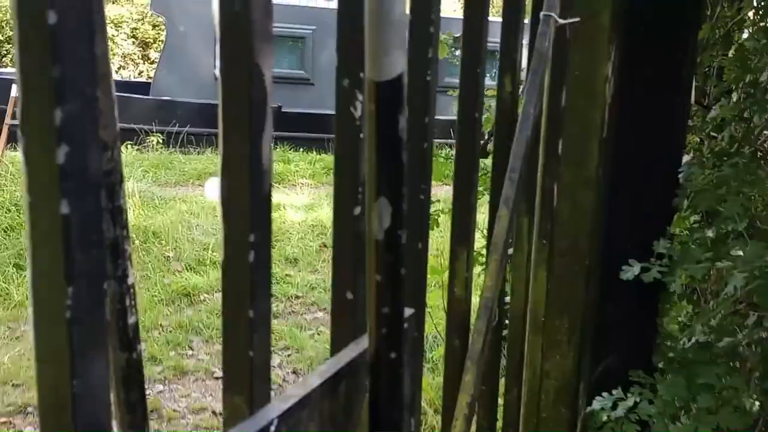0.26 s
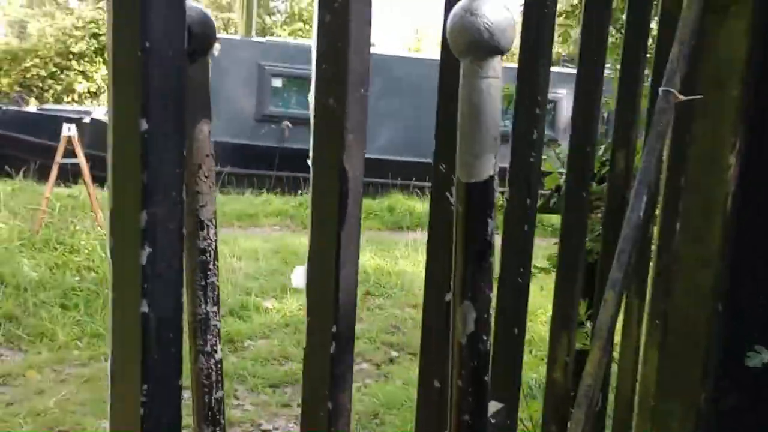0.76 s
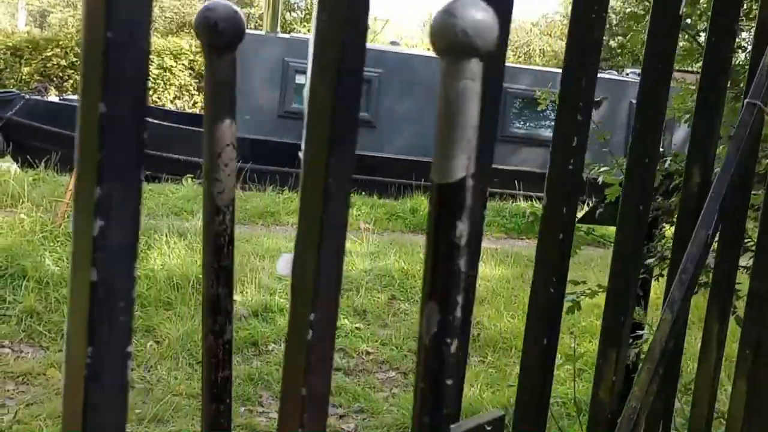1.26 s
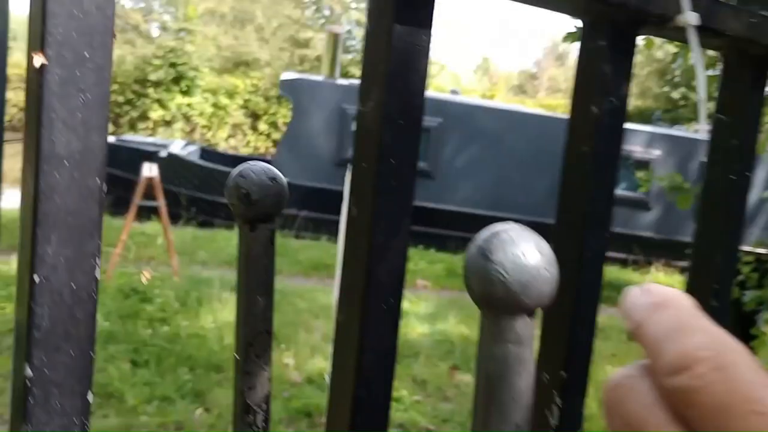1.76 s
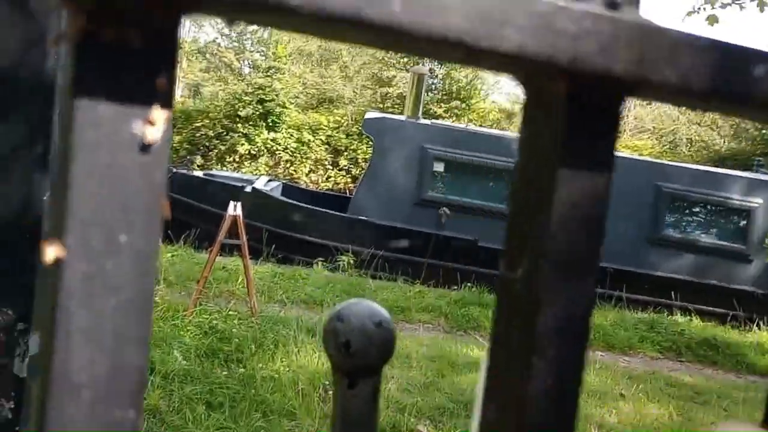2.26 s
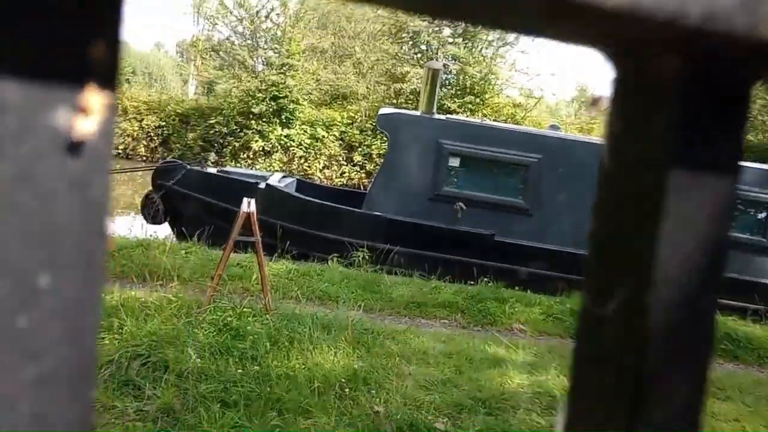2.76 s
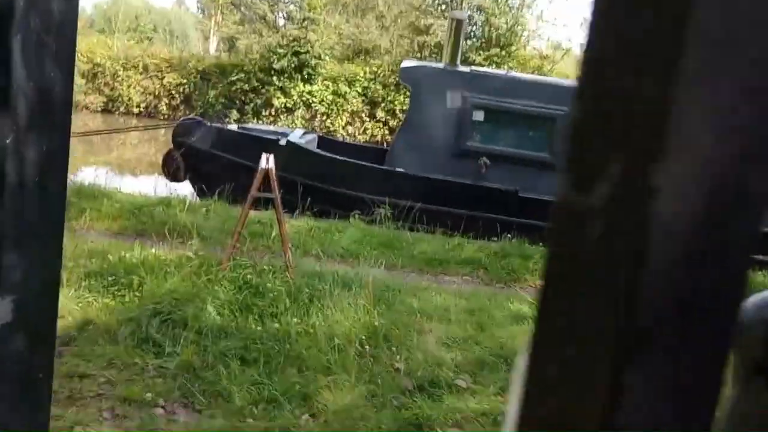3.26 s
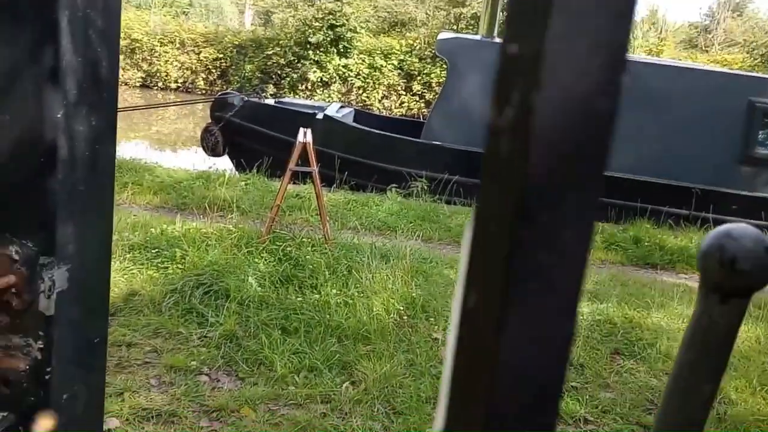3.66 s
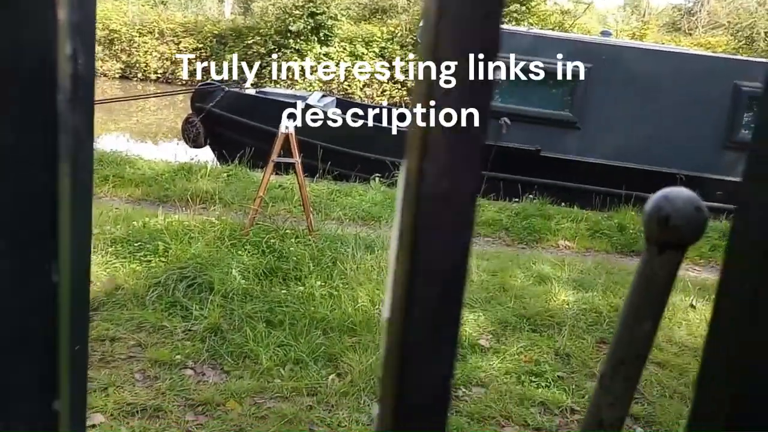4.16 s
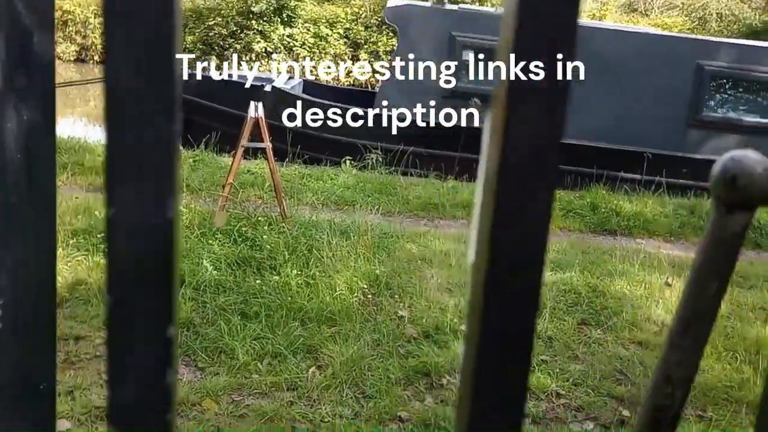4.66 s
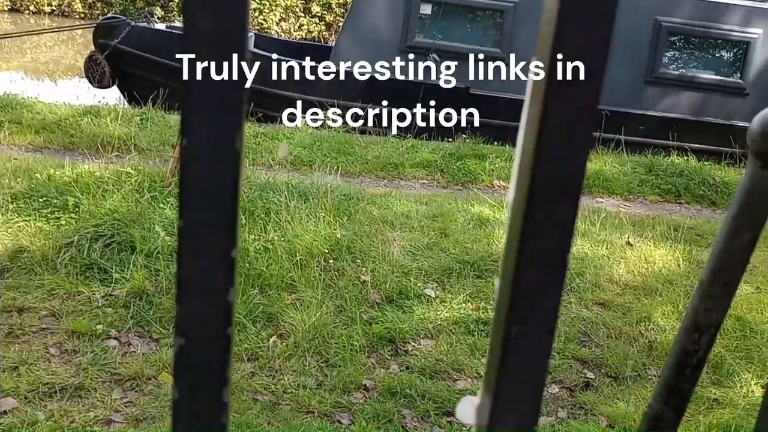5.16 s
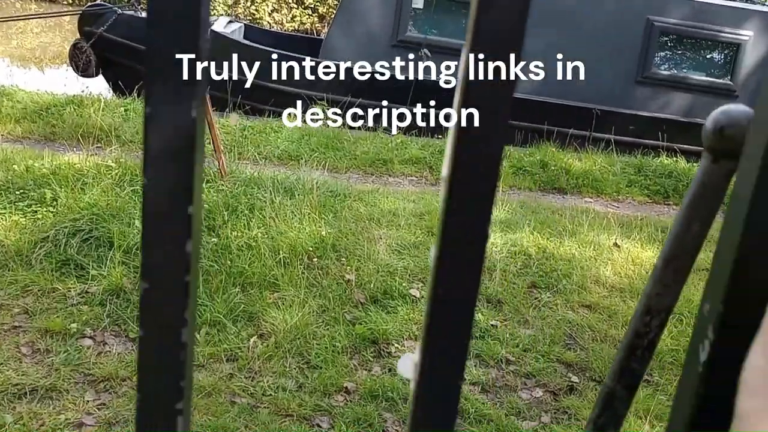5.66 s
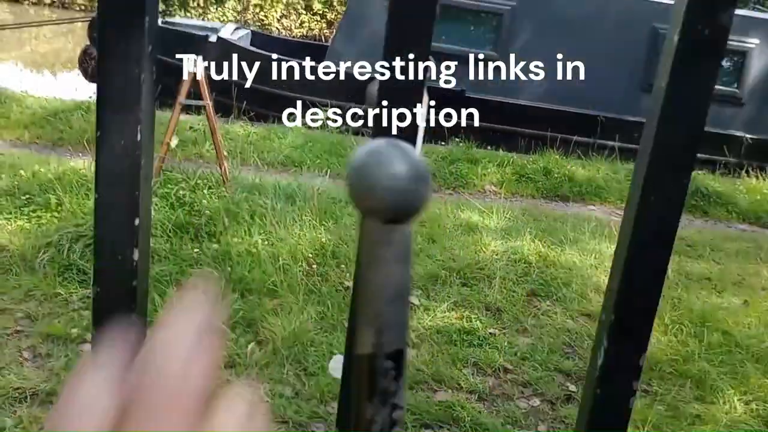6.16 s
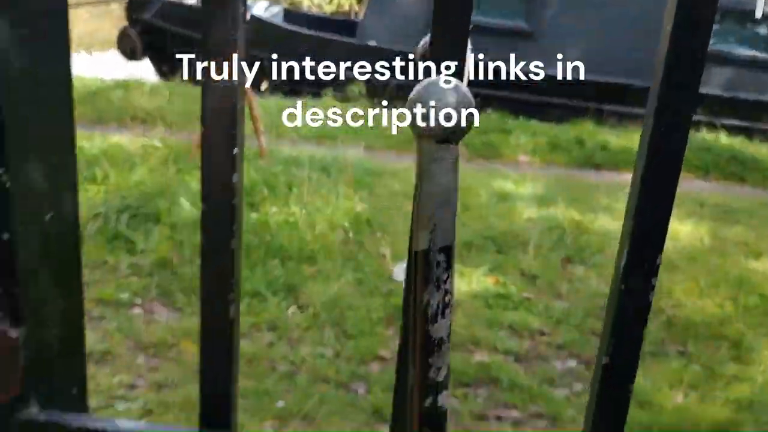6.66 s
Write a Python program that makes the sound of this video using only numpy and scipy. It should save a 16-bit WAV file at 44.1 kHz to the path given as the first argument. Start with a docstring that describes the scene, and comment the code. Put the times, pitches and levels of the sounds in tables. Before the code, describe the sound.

An iron gate is worked outdoors: knocks, three bright metallic clanks, a scrape, a brief hinge squeak, then a heavy clanging slam and dying rattle.

```python
"""Iron gate worked by hand, outdoors, close up

A brief rush of air ends abruptly, then quiet air fades in under small ticks of handling.
The drop rod knocks, the frame clanks three times, iron slides, a hinge squeaks, then the leaf thuds home
against its stop and rattles. Each blow sums a chattering crack and clang of crowded fence modes, a longer
after-ring and the struck bar's own partials; the rest is shaped noise, and a swept tone for the hinge."""
import sys
import numpy as np
from scipy import signal
from scipy.fft import rfft, irfft
from scipy.io import wavfile

SR = 44100
rng = np.random.default_rng(int(sys.argv[2]) if len(sys.argv) > 2 else 0)


def store_wav(level_fs):
    """Save 16-bit WAV to argv[1]."""
    pcm = np.round(np.clip(np.atleast_2d(level_fs), -1, 1) * 32767)
    wavfile.write(sys.argv[1], SR, pcm.T.astype(np.int16))


N = 305304

# crowded modes of the whole fence; both levels are relative, clang times are for a length factor of 1:
# (pitch_hz, clang_db_per_hz, clang_t60_s, after_ring_db_per_hz, after_ring_t60_s,
#  left_right_correlation, left_minus_right_db)
FENCE_SPECTRUM = [(53.4, -39, 1, -26, 1.2, 1, -2), (147, -18, 0.68, -24, 2.63, 0.96, 3),
                  (296, -15.5, 1, -8, 3.2, 0.82, 0.5), (480, -15, 0.6, -8, 4, 0.36, 3),
                  (790, -6.5, 0.41, 4, 1.8, 0.044, -1), (1254, -6.5, 0.54, 0, 1.78, -0.47, 1),
                  (2060, 4, 0.17, 6.5, 1.49, -0.058, -12), (2855, -0.5, 0.39, -5, 0.56, 0.18, 9),
                  (3746, -12.5, 0.23, -2.5, 1.33, -0.046, 2), (6090, -17, 0.14, -24.5, 0.54, -0.081, -4.5),
                  (9150, -33, 0.27, -44, .5, 0.33, 1), (15600, -37.5, 0.19, -44.5, .4, -0.61, -2)]

CUTOFF_HZ = 16000
EDGES_HZ = 31.25 * 2 ** np.arange(0, 9.1, .5)   # half-octave bands
CENTRES_HZ = np.sqrt(EDGES_HZ[1:] * EDGES_HZ[:-1])
RING_SAMPLES = 2 * SR
AGE = np.arange(RING_SAMPLES) / SR   # seconds since one sound began
TIME = np.arange(N) / SR
LEFT_RIGHT_SIGN = np.array([[1], [-1]])


def from_db(db):
    """Decibels to gain."""
    return 10 ** (np.asarray(db) / 20)


def rms_one(x):
    """Scale to an rms of 1."""
    return x / np.sqrt(np.mean(x ** 2) + 1e-20)


def at_hz(rows, hz):
    """Every column of a spectrum table, read on a log-frequency axis."""
    known_hz, *columns = np.transpose(rows)
    return [np.interp(np.log(hz), np.log(known_hz), column) for column in columns]


def fade(t60):
    """Free decay by 60 dB in t60 seconds."""
    return np.exp(-np.log(1000) * AGE / max(t60, 1e-3))


def pan(db):
    """Left and right gains of equal total power, db apart."""
    return rms_one(from_db([[db / 2], [-db / 2]]))


def stereo(mid, side, likeness):
    """Two unrelated signals mixed into a pair with the given correlation."""
    c = np.clip(likeness, -1, 1)
    return np.sqrt((1 + c) / 2) * mid + np.sqrt((1 - c) / 2) * side * LEFT_RIGHT_SIGN


def add(out, s, sound):
    """Mix a sound in at time s."""
    start = round(s * SR)
    out[:, start:start + sound.shape[1]] += sound[:, :N - start]


def open_air(spectrum):
    """Smooth distant noise, the two sides most alike in the bass."""
    # (pitch_hz, left_right_correlation)
    air_likeness = [(50, 0.92), (150, 0.92), (400, 0.66), (1000, 0.033), (4000, 0.01)]
    hz = np.maximum(np.fft.rfftfreq(N, 1 / SR), 1)
    mid, side = rfft(rng.normal(size=(2, N))) * from_db(at_hz(spectrum, hz)[0])
    likeness = at_hz(air_likeness, hz)[0]
    return rms_one(irfft(stereo(mid, side, likeness), N))


def opening_rush(level_db=-39.5, end_s=0.1564, closing_s=0.0065):
    """Broad noise, strongest in the bass, that ends within a few milliseconds."""
    # outdoor rush: (pitch_hz, relative_level_db_per_hz)
    rush_spectrum = [(18, -48.5), (30, -31), (56, -9), (81, -0.5), (281, -9.5), (346, -15.5), (905, -16.5),
                     (1300, -21), (1870, -16.5), (3980, -43.5), (15000, -69)]
    closing = np.clip((end_s - TIME) / closing_s, 0, 1)
    return from_db(level_db) * open_air(rush_spectrum) * closing


def quiet_air(level_db=-60, start_s=.21, fade_in_s=0.17):
    """Steady, bass-heavy outdoor noise that fades in and stays."""
    # quiet open air: (pitch_hz, relative_level_db_per_hz)
    air_spectrum = [(18, -60), (30, -21.5), (124, -3.5), (319, -14), (355, -17), (780, -15.5), (962, -21),
                    (1760, -24.5), (2060, -22.5), (16000, -50.5)]
    fade_in = np.clip((TIME - start_s) / fade_in_s, 0, 1)
    return from_db(level_db) * fade_in * open_air(air_spectrum) * pan(-0.82)


def ticks(low_hz=620):
    """Light touches: band-limited noise puffs that die at once and leave the iron silent."""
    # dry ticks and scuffs of handling, levels before the make-up for band-limiting:
    # (start_s, level_db, decay_to_1/e_s)
    touches = [(0.392, -43, 0.00058), (0.551, -44, 0.0022), (2.147, -47, 0.0012), (2.231, -41, .011),
               (4.734, -33, .0007), (5.293, -51, .015), (5.324, -44, 0.013), (5.339, -41, 0.0091)]
    top_1ms_hz, dulling = 3030, 0.26   # top of a 1 ms tick; longer touches are duller, by this power
    out = np.zeros((2, N))
    for s, db, decay_s in touches:
        decay_s = max(decay_s, 1e-4)
        top_hz = np.clip(top_1ms_hz * (decay_s / .001) ** -dulling, 1.5 * low_hz, CUTOFF_HZ)
        noise = stereo(*rng.normal(size=(2, RING_SAMPLES)), 0.13)
        puff = noise * np.exp(-AGE / decay_s) + 1e-18
        band = signal.butter(2, [low_hz, top_hz], "band", fs=SR, output="sos")
        # make up the power lost to the narrower band
        add(out, s, from_db(db) * np.sqrt(SR / 2 / top_hz) * signal.sosfilt(band, puff))
    return out


def band_gains(db_per_hz):
    """Band amplitudes with total power 1."""
    gains = from_db(db_per_hz) * np.sqrt(np.diff(EDGES_HZ))
    return gains / np.linalg.norm(gains)


def fence_modes(db_per_hz, uneven_db, count):
    """Undamped modes of very unequal strength, gathered in stereo half-octave bands."""
    # the power packs the modes closest in the bass
    mode_hz = EDGES_HZ[0] + CUTOFF_HZ * ((np.arange(count) + rng.random(count)) / count) ** 1.6
    size = from_db(np.interp(mode_hz, CENTRES_HZ, db_per_hz) + uneven_db * rng.normal(size=count))
    strength = size * (rng.normal(size=(2, count)) + 1j * rng.normal(size=(2, count)))
    *_, likeness, pan_db = at_hz(FENCE_SPECTRUM, CENTRES_HZ)
    bands = []
    for k, (low, high) in enumerate(zip(EDGES_HZ, EDGES_HZ[1:])):
        inside = (mode_hz >= low) & (mode_hz < high)
        lines = np.zeros((2, RING_SAMPLES // 2 + 1), complex)
        lines[:, (mode_hz[inside] * RING_SAMPLES / SR).astype(int)] = strength[:, inside]
        mid, side = irfft(lines)
        bands.append(stereo(rms_one(mid), rms_one(side), likeness[k]) * pan(pan_db[k]))
    return np.array(bands, np.float32)


def bar_tone(modes, pan_db, twin=0.5, split=0.00406):
    """The clear partials of one bar; each beats with a twin bending the other way."""
    out = np.zeros((2, RING_SAMPLES))
    for hz, db, t60 in modes:
        # higher partials reach the two sides further out of step and more unequal
        skew = rng.choice([-1, 1]) * min(hz / 1100, .85) * LEFT_RIGHT_SIGN
        sides = pan(pan_db * np.sqrt(hz / 2000))
        turn = 2 * np.pi * hz * AGE
        twin_turn = turn * (1 + split * rng.choice([-1, 1]) * rng.uniform(0.432, 2.507))
        pair = np.sin(np.float32(turn + skew)) + twin * np.sin(np.float32(twin_turn - skew))
        out += from_db(db) * fade(t60) * sides * pair
    return out


def contact(chatter_db, chatter_s, taps_per_s=180):
    """One impact, then loose iron bouncing in uneven, dying taps; total energy 1."""
    struck = rng.random(RING_SAMPLES) < taps_per_s / SR
    taps = struck * rng.normal(size=RING_SAMPLES) * np.exp(-AGE / max(chatter_s, 1e-3))
    force = from_db(chatter_db) * taps / (np.linalg.norm(taps) + 1e-12)
    force[0] = 1
    return force[None, :SR // 2] / np.linalg.norm(force)


def rebounds(count):
    """The slammed leaf rebounds at an even pace, weaker and duller each time."""
    start_s, gap_s, chatter_s = 6.158, .082, 0.084
    first_db, loss_db = -9.5, 2.5
    first_treble_db, dulling_db = 5.5, 3
    return [(start_s + k * gap_s, "leaf", first_db - k * loss_db,
             first_treble_db - k * dulling_db, chatter_s) for k in range(count)]


def clanks(clean_crack=1.1, ring_follow=0.45):
    """Each blow: a crack, a quickly damped clang, the fence's after-ring and the struck bar's own tone."""
    # blows on the gate: (start_s, part_struck, strength_db, treble_db, chatter_decay_to_1/e_s)
    blows = [(0.893, "post", -33.5, -30, 0.028), (0.934, "rod", -32, 4.5, .11),
             (0.950, "rod", -29.5, 4.5, 0.075), (1.085, "rod", -35, -1, 0.024),
             (2.443, "frame", -38, -8, 0.015), (2.461, "frame", -24.5, 3.5, 0.0045),
             (2.585, "frame", -21.5, 2.5, 0.017), (2.840, "frame", -20, 4.5, .032),
             (2.856, "frame", -26.5, 11, .02), (2.905, "frame", -25.5, 3.5, 0.027),
             (4.298, "post", -59.5, -8, 0.067), (4.364, "rod", -37, -10, 0.013),
             (4.548, "post", -56.5, -15, 0.15), (5.617, "keeper", -23, -1.5, 0.0086),
             (5.773, "keeper", -42, 4, 0.0034), (5.844, "latch", -14.5, .5, 0.0059),
             (5.932, "leaf", -14, 3.5, 0.065), (5.941, "stop", -35, -10, 0.092),
             (5.982, "leaf", -9, -1.5, 0.11), (6.122, "leaf", -10.5, -1, 0.014),
             (6.632, "leaf", -22, 1, .014), (6.695, "leaf", -24, -0.5, 0.064)]
    # partials of each iron part, levels relative to its tone: part: (pitch_hz, level_db, t60_s)
    part_modes = {"stop": [(76, -16, 0.41), (112, -11, 0.32), (143.6, 0, 0.53), (176, -7, 0.67),
                  (211, -2, 0.97), (244, -9.5, 0.83)], "post": [(243, -14, 0.37), (349, 1, 1.86),
                  (412, -4, 0.11), (576, -7, 0.24), (672, -4, 0.78), (870, -18, 1.6)],
                  "rod": [(650, -9, 1.2), (899, -11, 2.56), (960, -22, 0.76), (1580, -10, 0.56),
                  (1930, -14, 1.3), (2250, -8, .4), (2430, -7, 0.73), (2950, -22, 0.4), (3700, -24, .6),
                  (3760, -28, 1.4), (5690, -10.5, 0.41)], "frame": [(275, -20, 6.2), (386.6, -21, 3.9),
                  (484, -30, 0.77), (580, -15, 4.7), (671, -6, 1.96), (896, -2.5, 2.7), (1029, -8, 2.9),
                  (1311.5, -25, 1.6), (1347, -2.5, 0.71), (1612, -5.5, 1.54), (1783, -17, 1.1),
                  (1853, -11, 1.6), (1910, -1.5, 2.15), (1904, -6, 1.85), (2030, -7, 0.94),
                  (2023, 12, 0.35), (2206, 15, 0.21), (2418, 2.5, 0.93), (2630, 2, 0.29), (3020, 1.5, 0.98),
                  (3185, 9.5, 0.29), (3725, -3, 0.8), (4470, -19, 0.63), (6090, -19, 1.36)],
                  "leaf": [(282, -13, 3.1), (352, -18.5, 2.4), (600, -27, 3.3), (808, -1.5, 0.34),
                  (888, -5, 1.9), (1026, -9, 3), (1375, 1.5, 1.1), (1590, -5.5, 2.6), (1614, 7, 0.66),
                  (1775, 5, 0.63), (1866, 10, 0.44), (1976, 0.5, 1.2), (2080, 4, 0.64), (2220, -3, 0.63),
                  (2680, -17, 1.1), (2420, -21, 0.5), (2610, -6, 1), (2720, 1, 0.74), (3100, -8, 1.4),
                  (3610, -11, 1), (3830, -7.5, 0.97)], "keeper": [(800, -8.5, 0.45), (1105, -10, 0.23),
                  (1420, -3, 0.57), (1900, -12, 0.39), (1946, -26, 0.4), (2470, 3.5, 0.58), (2820, -14, 1),
                  (3380, -7, 0.28), (4300, -11, .3), (5970, -24.5, 0.77)], "latch": [(925, 0, 0.15),
                  (1156, 2.5, 0.13), (3200, -2, 0.15), (4650, -18.5, 0.56), (6120, -11.5, 0.19),
                  (8120, -16.5, 0.32), (12830, -4, 0.29), (14340, -9, 0.21)]}
    # side each part leans to: part: left_minus_right_db at 2 kHz
    part_pan_db = {"stop": 4, "post": 1.5, "rod": -1, "frame": -7, "keeper": 0, "leaf": -7, "latch": 7}
    # softer contacts excite less treble: part: top_hz
    part_top_hz = {"stop": 900, "post": 4000, "rod": 7100, "frame": 10400, "keeper": 12300, "leaf": 13900,
                   "latch": 18000}
    # how each part takes a blow; the last two are relative to the blow:
    # part: (thump_db of a full-scale blow, clang_length_factor, after_ring_db, bar_tone_db)
    part_response = {"stop": (6, 1, -13, -0.5), "post": (2.5, 0.9, -5, -1.5),
                     "rod": (-10, 0.94, -11.5, -10.5), "frame": (-19, 1.4448, -15.5, -20),
                     "keeper": (-23, 1.63, -9.5, -4.5), "leaf": (-15, 0.81, -15, -20.5),
                     "latch": (-23.5, 0.98, -18, -7)}
    thump_hz, treble_hz, bass_edge_hz = 505, 3530, 60
    thump_follows = 0.31   # dB of thump per dB of strength: harder blows mostly add clang
    even_chatter_s = 0.027   # chatter of this length carries as much energy as its first impact
    grit_db = -16   # even a soft contact lets this much of the top treble through
    contact_s, crack_db, crack_s = 0.00053, -8, 0.0017

    out = np.zeros((2, N))
    clang_db, clang_t60, after_db, after_t60, _, _ = at_hz(FENCE_SPECTRUM, CENTRES_HZ)
    crowded = fence_modes(clang_db, uneven_db=3.5, count=640)
    lasting = fence_modes(after_db, uneven_db=2.5, count=400)
    lows = 1 / (1 + (CENTRES_HZ / thump_hz) ** 2)
    highs = 1 / (1 + (treble_hz / CENTRES_HZ) ** 4)
    onset = 1 - np.exp(-AGE / contact_s)   # the sound takes a moment to build
    after_fades = np.array([g * fade(t) for g, t in zip(band_gains(after_db), after_t60)], np.float32)

    for s, part, db, treble_db, chatter_s in blows + rebounds(count=4):
        full_thump_db, length, ring_db, tone_db = part_response[part]
        thump_db = full_thump_db + thump_follows * db - db
        chatter_db = 10 * np.log10(max(chatter_s, 1e-3) / even_chatter_s)
        # every blow meets the modes in new phases
        modes = np.roll(crowded, rng.integers(RING_SAMPLES), axis=2)
        late_modes = np.roll(lasting, rng.integers(RING_SAMPLES), axis=2)
        softness = 1 / np.sqrt(1 + (CENTRES_HZ / part_top_hz[part]) ** 8)
        softness = np.maximum(softness, from_db(grit_db))

        blow_db = db + thump_db * lows + treble_db * highs
        gains = band_gains(clang_db) * from_db(blow_db) * softness
        fades = np.array([g * fade(t * length) for g, t in zip(gains, clang_t60)], np.float32)
        clang = np.einsum("bt,bct->ct", fades, modes)

        # a clean single impact cracks harder than a rattle
        crack_gain = from_db(crack_db - clean_crack * chatter_db) * np.exp(-AGE / crack_s)
        crack = np.einsum("b,bct->ct", np.float32(gains * highs), modes) * crack_gain
        force = contact(chatter_db, chatter_s)
        body = signal.fftconvolve((clang + crack) * onset, force, axes=1)[:, :RING_SAMPLES]

        ring_gains = np.float32(from_db(db + ring_db + ring_follow * treble_db * highs) * softness)
        after_ring = np.einsum("bt,bct->ct", ring_gains[:, None] * after_fades, late_modes)
        tone = from_db(db + tone_db) * bar_tone(part_modes[part], part_pan_db[part])
        add(out, s, body + (after_ring + tone) * onset)

    # thin bars hardly radiate deep bass
    bass_cut = signal.butter(4, bass_edge_hz, "high", fs=SR, output="sos")
    return signal.sosfilt(bass_cut, out + 1e-18)


def resonance(x, hz, width_hz):
    """Two-pole resonance with gain near 1 on top."""
    r = np.exp(-np.pi * width_hz / SR)
    feed = np.array([1, 0, -1]) * (1 - r * r) / 2
    return signal.lfilter(feed, [1, -2 * r * np.cos(2 * np.pi * hz / SR), r * r], x)


def stroke(start_s, attack_s, hold_s, release_t60):
    """Gain over time: an accelerating rise, a hold and a free decay."""
    age = TIME - start_s
    rise = np.clip(age / max(attack_s, 1e-3), 0, 1) ** 2
    release = np.clip((age - attack_s - hold_s) / max(release_t60, 1e-3), 0, 10)
    return rise * np.exp(-np.log(1000) * release)


def slide(grains_per_s=3500):
    """Iron sliding on iron: fine friction grains excite thin, high resonances."""
    # strokes before the third clank and as the leaf goes home:
    # (start_s, level_db, attack_s, hold_s, release_t60_s)
    strokes = [(2.73, -37.5, .085, 0.028, 0.32), (5.927, -38.5, 0.014, 0.17, 0.045),
               (6.12, -33.5, .004, .02, 0.59)]
    # what the sliding iron rings with: (pitch_hz, width_hz, relative_level_db)
    slide_modes = [(4540, 51, 3), (6080, 1050, -9), (8900, 680, -17), (12060, 640, -14.5),
                   (13900, 1300, -18)]
    grains = (rng.random(N) < grains_per_s / SR) * rng.normal(size=(2, N)) + 1e-18
    pressure = sum(from_db(db) * stroke(s, attack_s, hold_s, t60)
                   for s, db, attack_s, hold_s, t60 in strokes)
    ringing = sum(from_db(db) * resonance(grains, hz, width) for hz, width, db in slide_modes)
    return pressure * rms_one(ringing)


def hinge(ring_db=-34, build_s=0.0088):
    """Stick-slip locks onto one mode, sags in pitch and swells; when it lets go the iron rings on."""
    # squeak harmonics from the fundamental up: relative_level_db
    harmonics_db = [-2.5, -20, -56, -54]
    # iron ringing on after the squeak: (pitch_hz, relative_level_db, t60_s)
    hinge_modes = [(2850, -5, 0.71), (2887, -10, 1.49), (2954, 4, 0.5), (2986, -13.5, 1.37),
                   (5905, -19, 0.46), (8840, -33, 0.25)]
    peak_s, peak_hz, sag_hz_per_s = 4.352, 2940, 1750
    slopes_meet_db = -17.5   # the two slopes cross here; their blend passes 6 dB lower
    growth_db_per_s, release_db_per_s = 1048, 1301
    past_peak = np.clip(TIME - peak_s, -.2, .2)
    growth = from_db(-growth_db_per_s * past_peak)
    release = from_db(release_db_per_s * past_peak)
    gain = from_db(slopes_meet_db) / (growth + release)
    turn = 2 * np.pi * np.cumsum(peak_hz - sag_hz_per_s * past_peak) / SR
    phase = turn + np.array([[np.pi / 2], [0]])   # left leads by a quarter turn
    tone = sum(from_db(db) * np.sin((k + 1) * phase) for k, db in enumerate(harmonics_db))
    out = np.sqrt(2) * gain * tone * pan(11)
    ring = bar_tone(hinge_modes, pan_db=-0.5) * (1 - np.exp(-AGE / build_s))
    add(out, peak_s, from_db(ring_db) * ring)
    return out


def scene():
    """A brief outdoor rush stops dead; quiet air fades in and the gate is worked."""
    return opening_rush() + quiet_air() + ticks() + clanks() + slide() + hinge()


def record(dry):
    """The highest peaks are rounded and the top is cut."""
    top_cut = signal.ellip(10, .2, 80, CUTOFF_HZ, fs=SR, output="sos")
    return signal.sosfilt(top_cut, np.tanh(dry))


dry = scene()
out = record(dry)
store_wav(out)
```